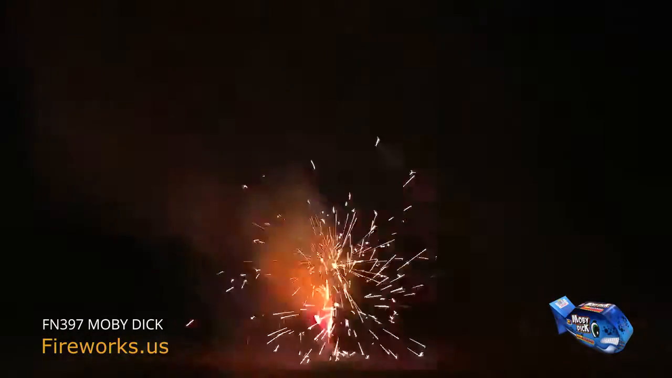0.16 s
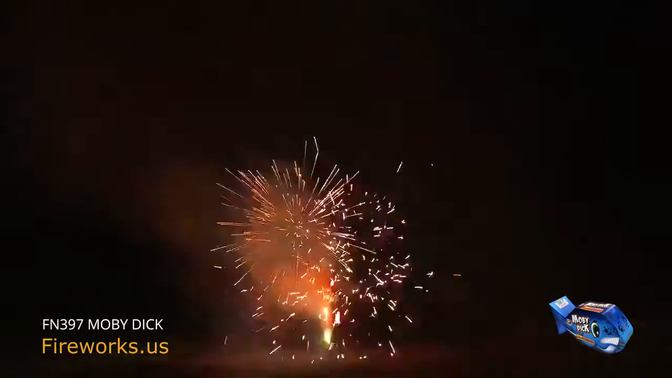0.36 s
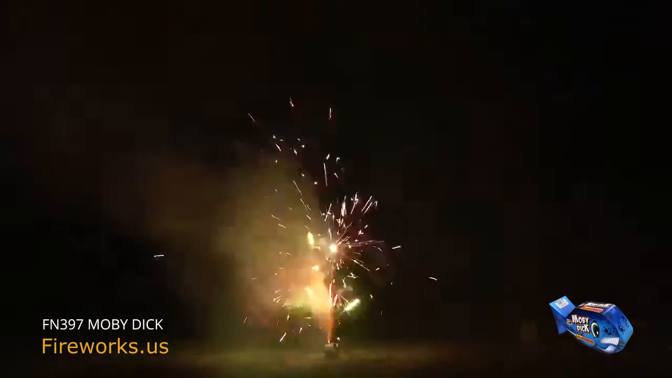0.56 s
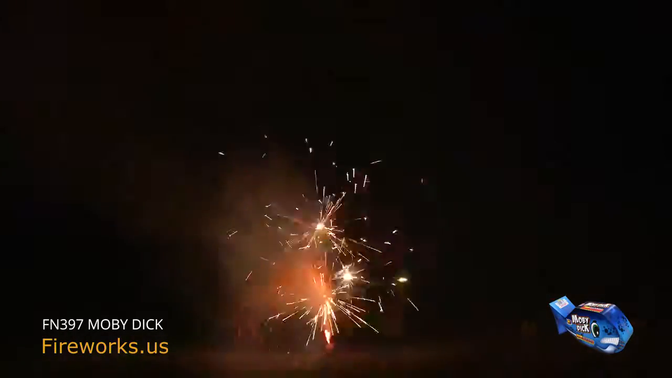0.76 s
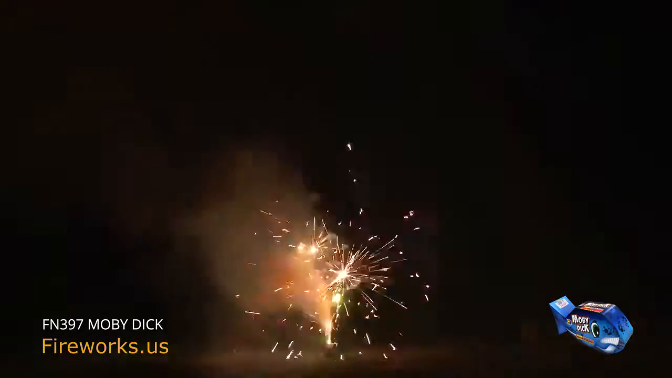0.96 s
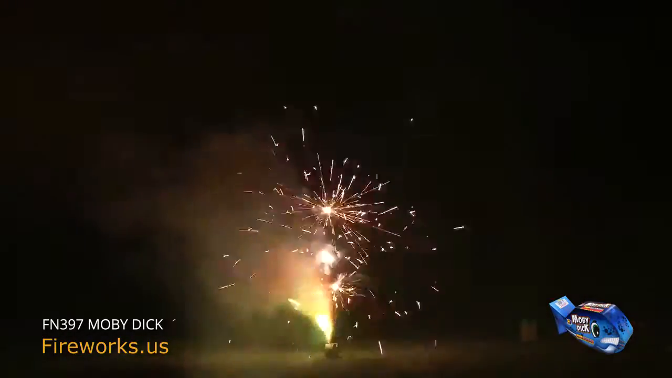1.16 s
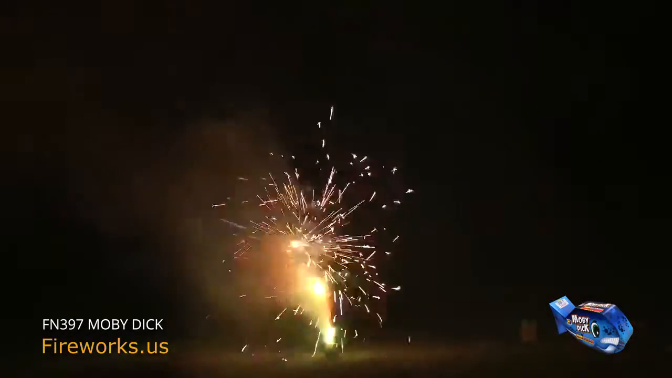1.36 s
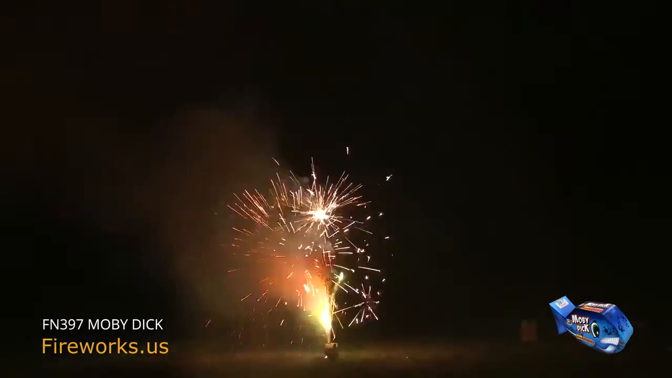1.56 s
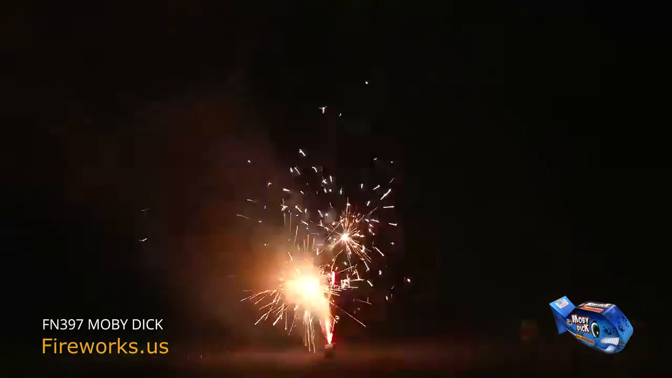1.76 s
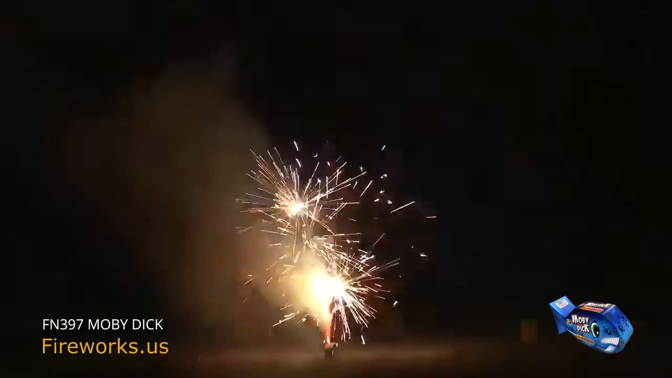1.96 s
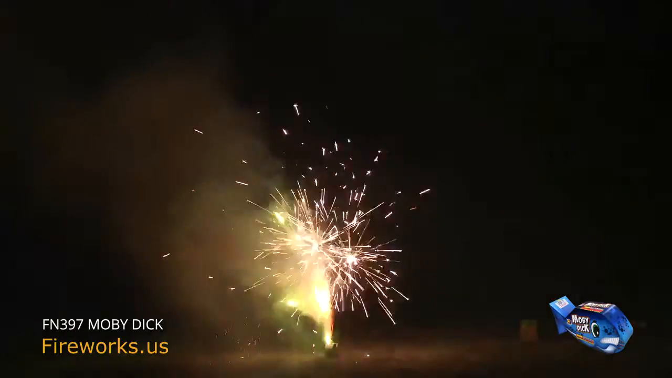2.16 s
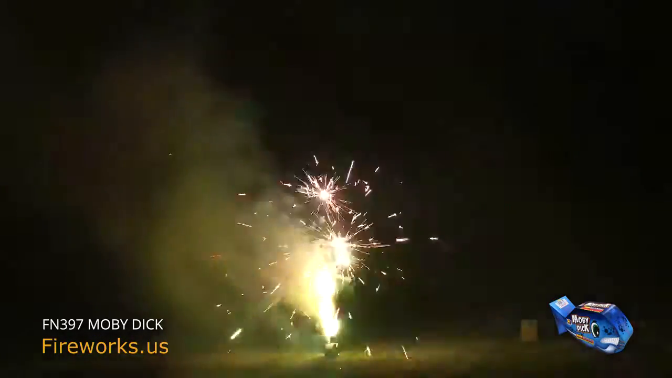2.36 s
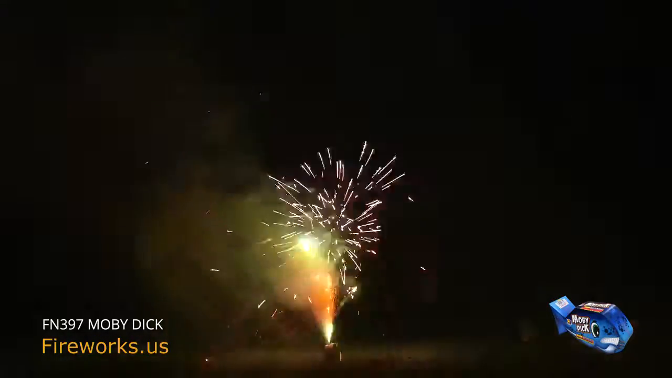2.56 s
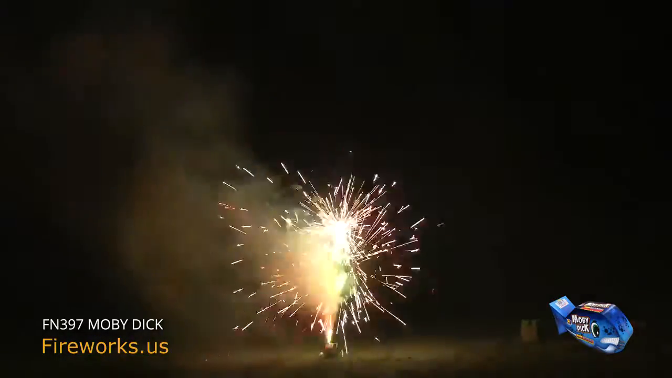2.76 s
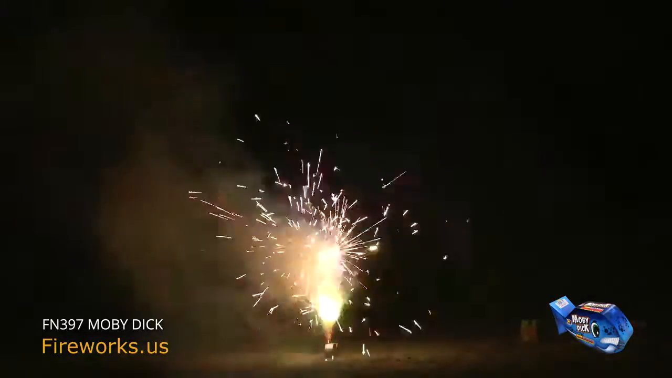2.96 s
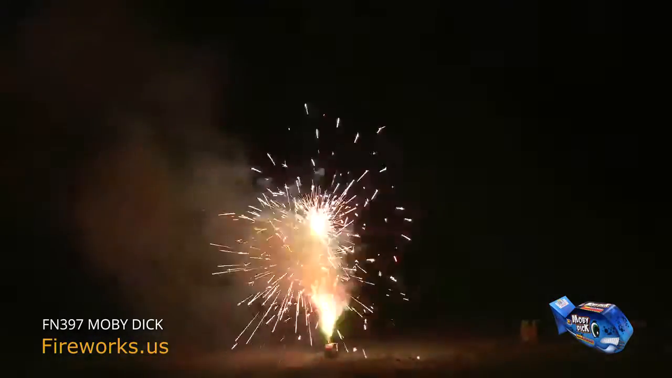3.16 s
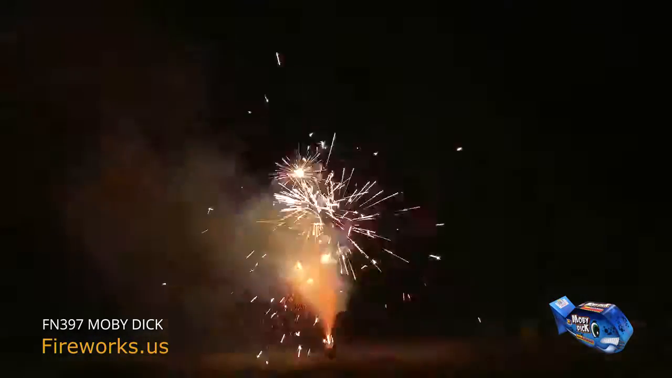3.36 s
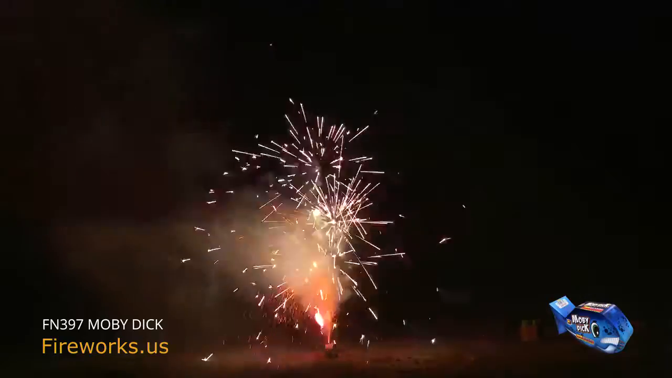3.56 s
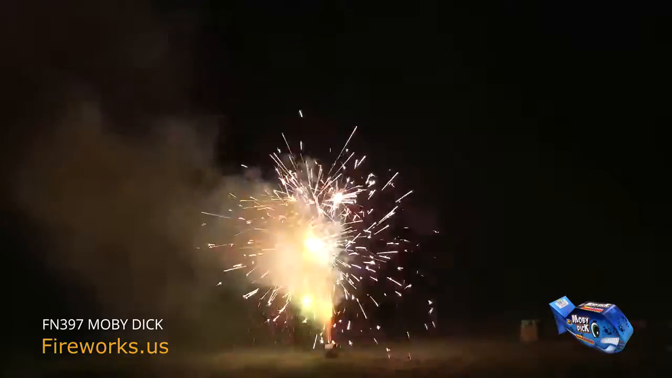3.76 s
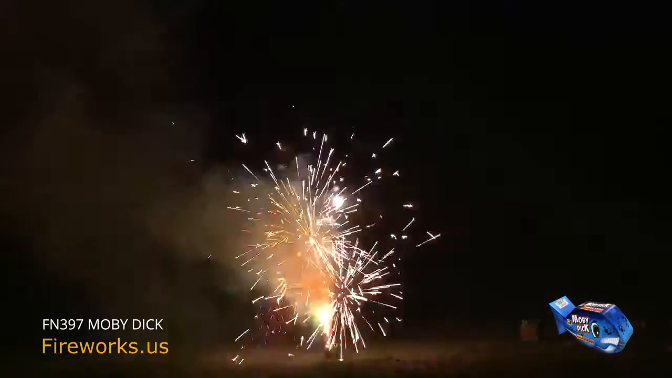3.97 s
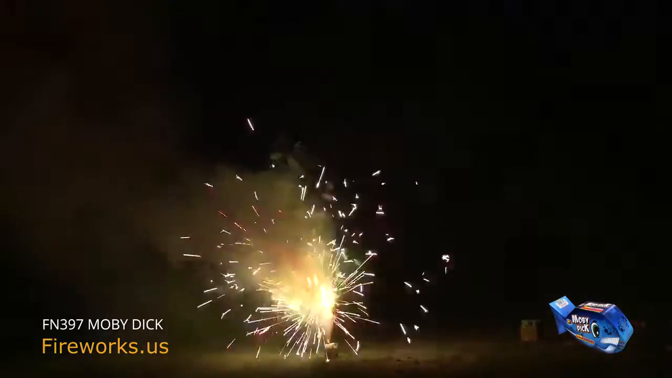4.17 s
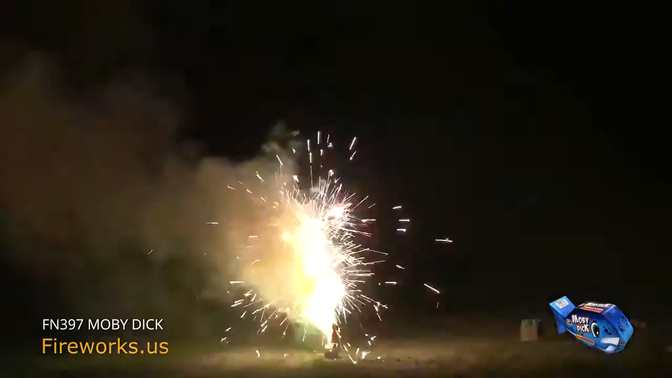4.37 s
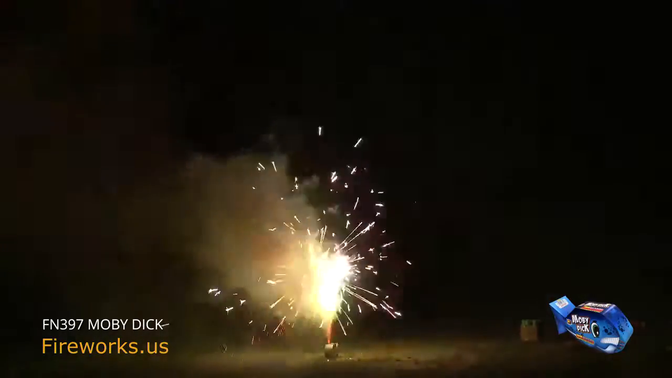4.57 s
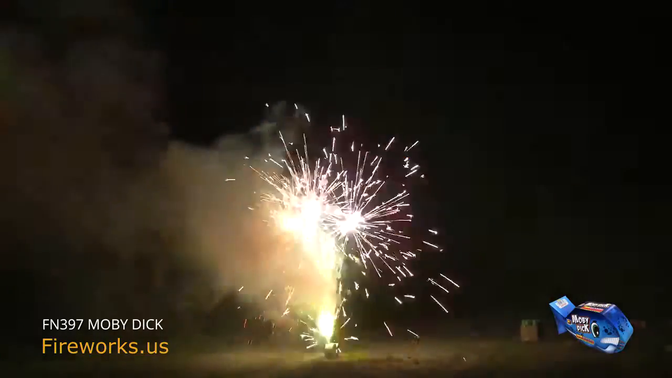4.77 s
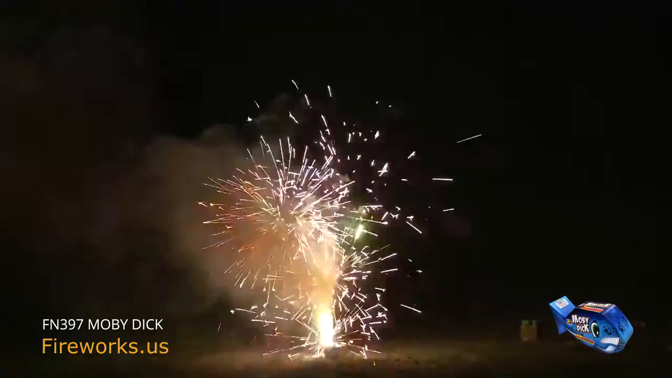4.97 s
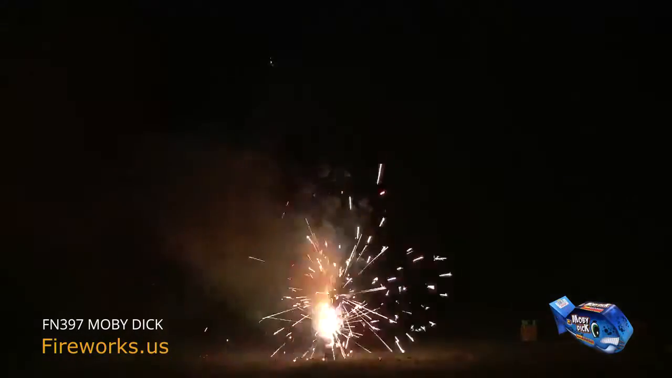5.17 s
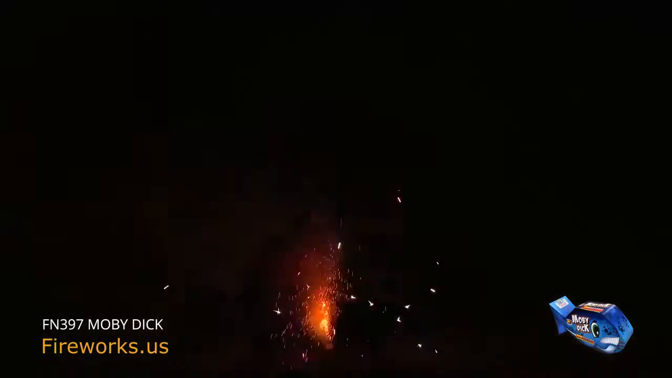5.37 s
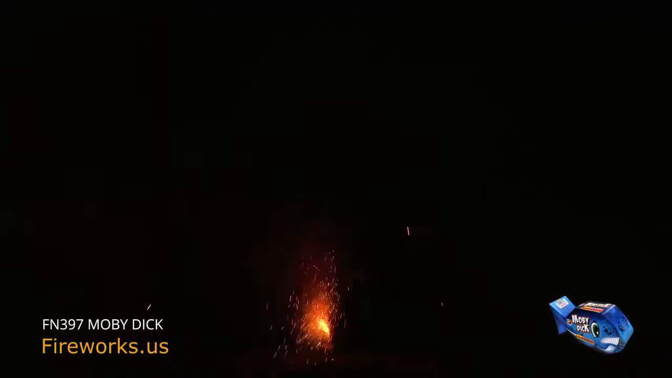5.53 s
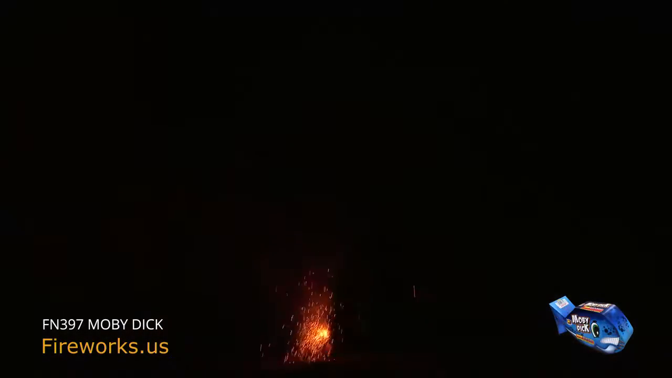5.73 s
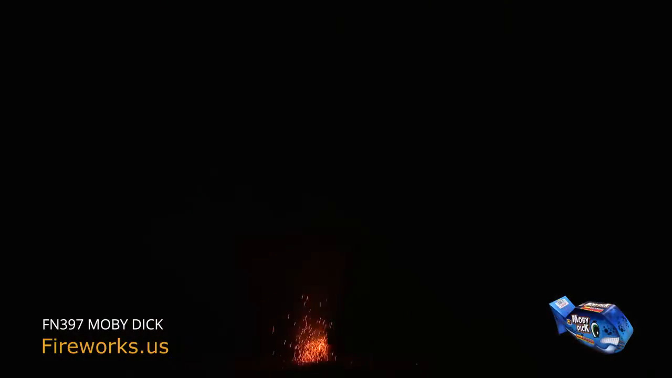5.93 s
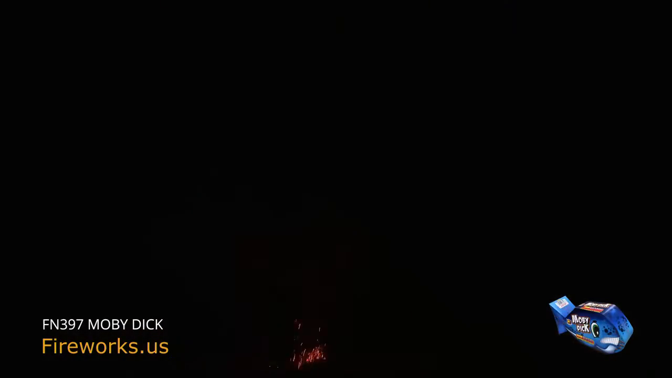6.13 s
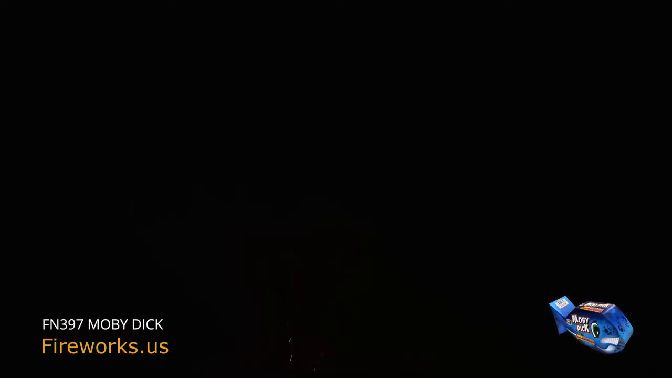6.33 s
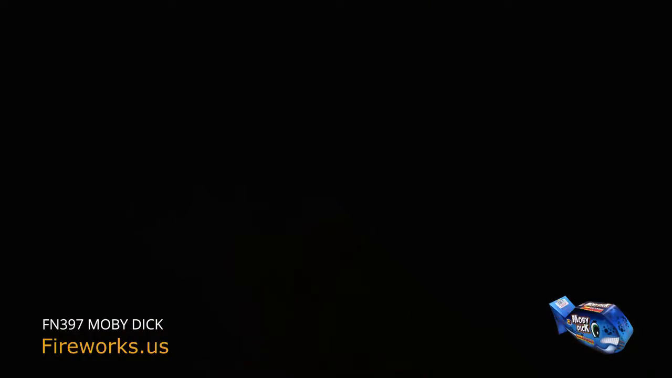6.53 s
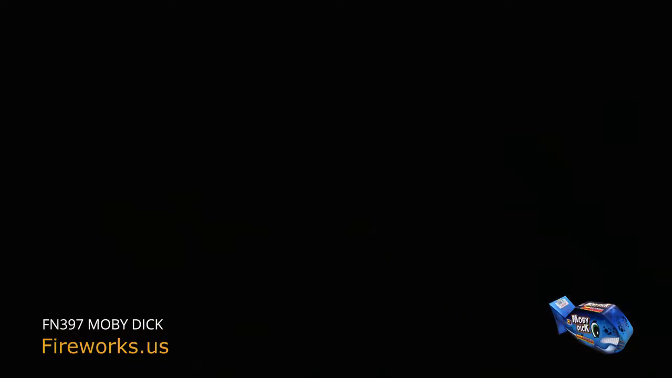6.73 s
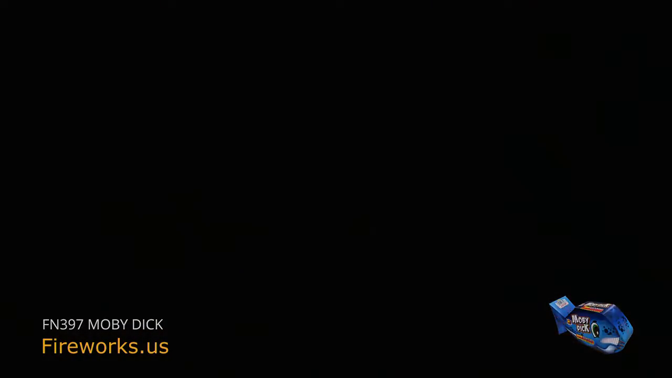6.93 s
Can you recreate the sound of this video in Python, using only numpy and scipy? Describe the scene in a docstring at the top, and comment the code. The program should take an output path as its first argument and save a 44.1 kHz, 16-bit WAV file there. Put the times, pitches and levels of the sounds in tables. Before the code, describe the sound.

A fountain firework on the ground throws out a dense, irregular stream of sharp, bright cracks over a softer hiss of gas, with a light echo from the yard. After about five and a half seconds the fuel runs out and it stops with a last couple of pops. Faint chirping insects, a few rising frog whistles and a distant engine drone remain. A small camera microphone picks it up outdoors at night.

```python
"""Sharp cracks swarm over the hiss of a fountain firework in a yard at night, until its fuel runs out.
Each bursting spark sends out a pressure pulse that arrives directly, off the ground and off two walls,
and excites the resonances of a small camera's microphone port; the hiss is the turbulent gas jet.
As the cracks end, the gain control recovers, and a distant engine, chirping insects and a few
whistling frogs come forward."""
import sys
import numpy as np
from scipy import signal
from scipy.fft import rfft, irfft, next_fast_len
from scipy.io import wavfile
from scipy.ndimage import map_coordinates

SR = 44100
rng = np.random.default_rng(int(sys.argv[2]) if len(sys.argv) > 2 else 0)


def store_pcm(level_fs):
    """Save levels as 16-bit WAV."""
    pcm = np.round(np.clip(level_fs, -1, 1) * 32767).astype(np.int16)
    wavfile.write(sys.argv[1], SR, np.atleast_2d(pcm).T)


N = 308700

# prominent spark bursts: (time [s], level over the first millisecond [dB], spectral tilt [dB/octave])
CRACKS = [(0.0059, -15, -0.5), (0.0658, -21, -1.5), (0.085, -17, 1), (0.1361, -10, -1), (0.1448, -13.5, 0),
          (0.17, -15.5, 0), (0.1753, -17.5, 0), (0.183, -19.5, 0), (0.2517, -15, 2), (0.2711, -16.5, -3),
          (0.2898, -18, 0), (0.2966, -20, -2.5), (0.3497, -10.5, -1), (0.3708, -21.5, -0.5),
          (0.4413, -22, -2), (0.4499, -23.5, -4.5), (0.467, -20.5, -3), (0.4902, -16.5, -1.5),
          (0.5148, -15.5, 1.5), (0.5204, -19, -2.5), (0.5548, -20.5, -2.5), (0.6638, -24, -2),
          (0.676, -23, 1.5), (0.6999, -18, 0.5), (0.7397, -23, 1), (0.748, -22.5, -2.5), (0.789, -14.5, 1),
          (0.8041, -25, -2), (0.8116, -12, 0.5), (0.8973, -20, 0), (0.9302, -15.5, 1), (0.9659, -19, 0.5),
          (0.9788, -19.5, -0.5), (1.002, -15, 0), (1.0245, -15.5, -0.5), (1.035, -19, -0.5),
          (1.0496, -16, 2), (1.0829, -13, 1.5), (1.0924, -14.5, 0.5), (1.0977, -22, 2.5),
          (1.104, -16.5, -0.5), (1.1575, -17.5, 1.5), (1.1749, -15.5, -1.5), (1.1963, -19, -2),
          (1.204, -18.5, 0), (1.2443, -12.5, 0.5), (1.2512, -21.5, -4), (1.2888, -17.5, -1),
          (1.2948, -20.5, 3.5), (1.3094, -13.5, 1), (1.3416, -18.5, -3), (1.3795, -14, 0), (1.398, -15, 3),
          (1.4026, -16.5, -1.5), (1.4056, -14, -1), (1.4151, -14, 0), (1.4499, -16.5, 0.5),
          (1.456, -14, 0.5), (1.4662, -24, -3), (1.4841, -18, 0), (1.5066, -14.5, -0.5), (1.519, -12.5, 4),
          (1.5281, -19.5, -0.5), (1.5348, -11.5, 1), (1.5476, -19, 0), (1.5756, -19.5, -1.5),
          (1.619, -15, 0.5), (1.6396, -27.5, -2.5), (1.6721, -26.5, 3), (1.6788, -25.5, 0.5),
          (1.6896, -18.5, 0), (1.747, -16.5, -1), (1.7851, -12.5, 0), (1.8117, -22, -3), (1.814, -12, -1),
          (1.835, -22, -1), (1.8531, -18.5, -1.5), (1.8695, -12.5, -0.5), (1.8907, -23.5, 5),
          (1.8966, -15.5, -1.5), (1.9004, -12, -0.5), (1.9189, -15, -1.5), (1.9341, -21, -0.5),
          (1.9665, -17.5, 0), (1.9783, -21, -1), (1.9901, -22, -5.5), (2.0063, -21, 2), (2.0238, -22, 0),
          (2.0795, -17.5, 0.5), (2.1024, -18, -1), (2.1494, -20.5, 1), (2.1649, -17, -1.5),
          (2.1711, -17.5, -2.5), (2.188, -13.5, 0), (2.2178, -17, -1.5), (2.2266, -12.5, -2),
          (2.2304, -15, 0.5), (2.2574, -19.5, -1), (2.299, -16, -0.5), (2.3085, -17.5, -3),
          (2.3547, -13.5, -1), (2.3719, -12, -1), (2.3917, -17, 1), (2.3944, -20, -1), (2.4224, -20, 0.5),
          (2.439, -11, 0.5), (2.4495, -14.5, -0.5), (2.4586, -14.5, -1), (2.4913, -18, 0),
          (2.502, -21.5, -2.5), (2.5215, -16, 0), (2.59, -18.5, 2.5), (2.5927, -14.5, 0),
          (2.5991, -21.5, -3.5), (2.6275, -21, -3), (2.637, -13, 2.5), (2.685, -18, 1),
          (2.7006, -22.5, 0.5), (2.7502, -14.5, 0), (2.7552, -24, -3), (2.8164, -14, -1), (2.819, -17, 1.5),
          (2.8477, -15.5, -2), (2.8504, -15, -0.5), (2.862, -14.5, 0.5), (2.9086, -13, 0),
          (2.9107, -15, -2), (2.9143, -12, 1.5), (2.9262, -24, -2.5), (2.9468, -13, -0.5),
          (2.961, -27, -4.5), (2.9672, -14, 0.5), (2.9844, -14.5, -1), (3.0236, -13.5, -1.5),
          (3.0325, -18, -1.5), (3.1015, -19.5, 1.5), (3.1087, -14, -2), (3.1322, -17.5, 0),
          (3.1408, -18.5, -1), (3.18, -18.5, 0), (3.2245, -11.5, 0), (3.2627, -16, -1.5),
          (3.2686, -12.5, 2), (3.2702, -13, -1.5), (3.3029, -19.5, 3), (3.316, -13, -1), (3.342, -21, -1.5),
          (3.3624, -12.5, -0.5), (3.389, -17.5, -2), (3.4153, -16, 0.5), (3.4231, -20.5, -3),
          (3.4273, -14.5, -0.5), (3.4584, -20.5, -2.5), (3.4677, -15.5, 2.5), (3.4716, -13.5, -0.5),
          (3.4849, -19, -2.5), (3.4904, -13.5, 0), (3.5635, -19, -0.5), (3.5942, -15, -0.5),
          (3.6159, -11.5, -0.5), (3.6311, -13, 0), (3.6382, -21, 2.5), (3.6617, -12.5, 2.5),
          (3.6635, -19, -1.5), (3.676, -29, -3.5), (3.6948, -14, 0), (3.6999, -16, 1.5),
          (3.718, -22.5, -1.5), (3.7546, -17.5, -1.5), (3.7657, -29, -3), (3.7712, -19, 0),
          (3.8067, -13.5, -2), (3.842, -23, -2), (3.8525, -13, 1.5), (3.8703, -16, 0.5),
          (3.8938, -18.5, -3), (3.9008, -25, -3.5), (3.9077, -11.5, 2), (3.9139, -19.5, 2),
          (3.9252, -22, -4), (3.9415, -16.5, 0), (3.9539, -24.5, 1.5), (3.9605, -21, -3), (3.967, -19, -5),
          (3.9838, -20.5, -3), (4.0009, -16.5, -1), (4.0415, -15.5, 2), (4.0548, -12.5, 0.5),
          (4.0608, -15.5, 0), (4.0773, -20.5, -1.5), (4.0936, -24.5, -1), (4.1038, -16, -0.5),
          (4.1474, -13.5, 1), (4.1555, -16, -1), (4.1672, -19, -1.5), (4.171, -16.5, -1),
          (4.2051, -13.5, 0), (4.2183, -12, 1), (4.2278, -18.5, -2.5), (4.2492, -14.5, 0),
          (4.2574, -23.5, -4), (4.267, -22, -1.5), (4.2789, -22.5, 1), (4.2969, -17, 2.5),
          (4.3149, -17, -1), (4.3273, -22.5, 0), (4.3688, -20, 1), (4.4265, -21.5, 2), (4.4425, -15.5, 0.5),
          (4.477, -19, -3), (4.5032, -17.5, -3), (4.5163, -13, 1), (4.532, -15, -1.5), (4.5807, -16.5, -1),
          (4.5815, -11.5, 0.5), (4.5865, -16, -1.5), (4.5879, -13, 0), (4.5994, -15, -2), (4.604, -14, 3),
          (4.6154, -15.5, -1), (4.6173, -17.5, 2.5), (4.6408, -24.5, -3.5), (4.6532, -22.5, 2),
          (4.6883, -17.5, -4), (4.7027, -20, -1), (4.7103, -11.5, 0.5), (4.7353, -15.5, 2.5),
          (4.7688, -20, -3), (4.8039, -12, 0.5), (4.8347, -15.5, -0.5), (4.8489, -12, 3),
          (4.8509, -19.5, -2), (4.8721, -13, 0.5), (4.8871, -14, 4), (4.9105, -16, -1),
          (4.919, -11.5, -1.5), (4.932, -13, 0), (4.9694, -11, 0.5), (4.9781, -15.5, -3.5),
          (4.9838, -12.5, 3.5), (4.9956, -21.5, -1), (5.0318, -20, 0), (5.053, -15.5, 0),
          (5.0632, -15.5, -1), (5.0878, -14.5, 1), (5.0908, -18.5, -3), (5.097, -20, 3), (5.1151, -12.5, 0),
          (5.136, -14, 0), (5.1455, -14, -2), (5.1608, -12.5, 5), (5.169, -21.5, -4.5),
          (5.1947, -14.5, 1.5), (5.229, -23, -1), (5.2472, -15.5, -1.5), (5.294, -31.5, 8),
          (5.3043, -14, 0), (5.3291, -14.5, -1), (5.349, -39, 11), (5.3706, -12, 2.5), (5.39, -18, -0.5),
          (5.408, -14, 2.5), (5.4217, -21.5, -5.5), (5.4937, -17, 1.5), (5.6475, -20.5, 4.5),
          (5.793, -32.5, 4)]
# spectrum of one burst's pressure pulse: (frequency [Hz], relative level [dB])
PULSE_SPECTRUM = [(40, -39.5), (150, -13.5), (245, -18), (340, -14.5), (500, -18), (680, -16.5),
                  (800, -18.5), (1150, -5), (1600, -3), (2700, -9.5), (3500, -10), (4600, -8.5), (6600, 2),
                  (8400, -5), (9400, -16.5), (11500, -16), (16000, -28)]
# spectrum of the gas jet: (frequency [Hz], relative level [dB])
JET_SPECTRUM = [(40, -24.5), (200, 0), (700, 0.5), (1300, -7.5), (2000, 4), (2800, 10.5), (3600, -0.5),
                (4600, 0.5), (6600, -6), (8500, -9.5), (11000, -28.5), (16000, -25.5)]
# resonances and notches of the camera body and microphone port: (centre [Hz], width [Hz], gain [dB])
PORT_RESONANCES = [(1347, 46, -3), (2007, 72, -3.5), (2158, 180, 4.5), (2970, 300, 1), (3270, 120, -5),
                   (3790, 140, -3), (4070, 240, 4.1), (4480, 260, -2), (5210, 460, 4), (6920, 2300, 2.5),
                   (10260, 1000, 8)]
# wall reflections: (delay [s], relative level [dB])
WALL_ECHOES = [(0.0242, -34), (.045, -25)]
# reverberation time of the yard: (frequency [Hz], time to fall 60 dB [s])
YARD_T60 = [(200, 1), (600, 0.7), (1800, 1.24), (3000, 0.62), (7000, 0.62), (10000, 0.3), (14000, 1.73)]
# colour of the reflected sound: (frequency [Hz], gain [dB])
YARD_COLOUR = [(200, 1.5), (700, -1.5), (1500, -6), (2100, -7.5), (2800, 1), (3400, -3), (4200, -2.5),
               (6600, -10.5), (9400, -1), (10300, -14.5), (12000, -9), (16000, -19)]
# harmonics of the distant engine: (time [s], fundamental level [dB], second harmonic level [dB])
ENGINE_LEVELS = [(0, -54, -55), (1.2, -54, -61.5), (2.8, -50.5, -60), (3.7, -57, -61.5), (5.4, -54, -53),
                 (6.1, -50.5, -57.5), (7, -44, -55.5)]
# even runs of insect chirps: (start [s], end [s], spacing [s], pitch [Hz], level [dB])
CHIRP_RUNS = [(5.759, 6.25, .1105, 3170, -55.5), (5.705, 5.95, 0.098, 3170, -59),
              (6.462, 7, .1025, 2980, -59.5)]
# frog calls: (time [s], length [s], start pitch [Hz], end pitch [Hz], relative level [dB])
FROG_WHISTLES = [(5.862, 0.32, 2550, 2960, -62.5), (6.104, 0.22, 2650, 3110, -62),
                 (6.66, .24, 2530, 2970, -73)]
# spectrum of the night's low rush: (frequency [Hz], relative level [dB])
NIGHT_SPECTRUM = [(15, -4), (45, -1), (85, 4.5), (140, -0.5), (190, -8), (260, -21.5), (380, -15.5),
                  (600, -15.5), (1000, -14.5), (1400, -18.5), (2000, -31.5), (3000, -27), (3600, -42.5),
                  (7000, -47.5), (16000, -57)]

BURN_GROWTH_DB_PER_S, BURNOUT_S, BURNOUT_DB_PER_S = 1.2, 5.5, 35


def spark_bursts(rows, ground_gain=0.55, ground_cutoff_hz=8500, scatter_db=-5, scatter_t60=0.014):
    """Interference: each pressure pulse adds to its duller ground reflection and scatter from the grass."""
    start_s, level_db, tilt = np.transpose(rows)[:, :, None]
    lag_ms = .17 + .31 * rng.random(start_s.shape)  # the higher the burst, the later its reflection
    size = 2048
    hz, t = np.fft.rfftfreq(size, 1 / SR), np.arange(size) / SR
    octaves = np.log2(np.clip(hz, 1200, 8000) / 5000)
    pulse = minimum_phase(log_interp(PULSE_SPECTRUM, hz) + port_db(hz) + tilt * octaves)
    bounce = ground_gain * np.exp(-2j * np.pi * hz * lag_ms / 1000) / (1 + 1j * hz / ground_cutoff_hz)
    scatter = rng.standard_normal((len(rows), size)) * amp(-60 * t / scatter_t60) * (t > .0007)
    scatter /= np.linalg.norm(scatter, axis=1, keepdims=True)
    grass = rfft(scatter) * amp(scatter_db + log_interp(YARD_COLOUR, hz))
    waves = irfft(pulse * (1 + bounce + grass))
    onset_rms = np.sqrt(np.mean(waves[:, :SR // 1000] ** 2, axis=1, keepdims=True))
    track = np.zeros(N)
    for start, wave in zip(start_s[:, 0], waves * amp(level_db) / onset_rms):
        add(track, start, wave)
    return track


def swarm(spread_s, floor_db, range_db, tilt, count):
    """A cluster process: lesser bursts gather round the cracks; most are weak, and the weak are duller."""
    parent, offset, strength, hue = rng.random((count, 4)).T
    parent_s = np.array(CRACKS)[(parent * len(CRACKS)).astype(int), 0]
    start_s = parent_s + spread_s * (2 * offset - 1)
    level_db = floor_db + range_db * strength ** 3 + burn_db(start_s)
    tilts = tilt + 4 * (hue - .5) + 1.5 * strength
    burning = (start_s > 0) & (start_s < BURNOUT_S + .09)
    return spark_bursts(np.c_[start_s, level_db, tilts][burning])


def small_sparks():
    """Fragmentation: pieces pop within milliseconds of a crack; tiny grains tick in a wider cloud."""
    fragments = swarm(spread_s=.006, floor_db=-32.5, range_db=9, tilt=-1.5, count=70)
    grains = swarm(spread_s=.09, floor_db=-50, range_db=14, tilt=-1, count=700)
    return fragments + grains


def sputter(band_hz=(1250, 4600)):
    """Band limiting muffles these pops, probably grains that burst while still in the tube."""
    pops = swarm(spread_s=.08, floor_db=-44, range_db=15, tilt=-2.5, count=430)
    return signal.sosfilt(signal.butter(2, band_hz, "bandpass", fs=SR, output="sos"), pops)


def jet(start_db=-62, flutter_db=1.0, surge_db=2.0):
    """Turbulence: gas rushing from the nozzle radiates noise that flutters fast and surges slowly."""
    hiss = shaped_noise(lambda hz: amp(log_interp(JET_SPECTRUM, hz) + port_db(hz)))
    level_db = start_db + burn_db(np.arange(N) / SR)
    return hiss * amp(level_db + flutter_db * wobble(130) + surge_db * wobble(22))


def burn_db(s):
    """Exponential growth and decay: the fountain gains strength, then its fuel runs out."""
    growth_db = BURN_GROWTH_DB_PER_S * np.minimum(s, BURNOUT_S)
    return growth_db - BURNOUT_DB_PER_S * np.maximum(s - BURNOUT_S, 0)


def yard_echo(sparks, diffuse_db=-11, build_up_s=0.012, wall_t60=0.0074, places=6):
    """Reflection: two walls slap back and trees scatter diffusely, by paths that vary with spark position."""
    echoes = np.zeros(N)
    place = np.arange(N) // (SR // 25) % places  # a different set of paths every 40 ms
    for k in range(places):
        hz, frame_s, spectra = signal.stft(rng.standard_normal(SR // 2), SR, nperseg=256)
        decay = amp(-60 * frame_s / log_interp(YARD_T60, hz)[:, None])
        response = signal.istft(spectra * decay, SR, nperseg=256)[1]
        t = np.arange(len(response)) / SR
        response *= 1 - np.exp(-t / build_up_s)
        response *= amp(diffuse_db) / np.linalg.norm(response)
        for delay_s, db in WALL_ECHOES:
            slap = rng.standard_normal(len(t)) * amp(-60 * t / wall_t60)
            add(response, delay_s + rng.normal(0, 0.0006), amp(db + 4) * slap / np.linalg.norm(slap))
        echoes += signal.fftconvolve(sparks * (place == k), response)[:N]
    return filtered(echoes, lambda hz: amp(log_interp(YARD_COLOUR, hz)))


def engine(firing_hz=77.4, sag_hz_per_s=.25):
    """Periodic excitation: a far engine drones at its slowly sagging firing rate and the octave above."""
    t = np.arange(N) / SR
    times, *levels = np.transpose(ENGINE_LEVELS)
    first_db, second_db = (np.interp(t, times, db) for db in levels)
    hz = firing_hz - sag_hz_per_s * t + .2 * wobble(4)
    phase = 2 * np.pi * np.cumsum(hz) / SR
    fundamental = amp(first_db + 0.92 * wobble(7.7)) * np.sin(phase)
    octave = amp(second_db + 1.2 * wobble(6.4)) * np.sin(2 * phase)
    return np.sqrt(2) * (fundamental + octave)


def insects(decay_s=0.002, chorus_db=-74, chorus_hz=2930, spread_hz=150, count=800):
    """Damped oscillation: each chirp is a brief tone; near insects repeat it over a random far chorus."""
    track, t = np.zeros(N), np.arange(SR // 10) / SR
    envelope = (t / decay_s / 2) ** 2 * np.exp(2 - t / decay_s)
    near = [(s, hz, db) for start, end, spacing, hz, db in CHIRP_RUNS
            for s in np.arange(start, end, spacing)]
    far = zip(rng.uniform(0, N / SR, count),
              rng.normal(chorus_hz, spread_hz, count),
              rng.normal(chorus_db, 3, count))
    for s, hz, db in near + list(far):
        add(track, s, amp(db) * envelope * np.sin(2 * np.pi * hz * t))
    return track


def frogs(gain_db=-3, waver_db=2):
    """Frequency sweeps: far frogs whistle upward, swelling softly and wavering in level."""
    track = np.zeros(N)
    for s, length_s, start_hz, end_hz, db in FROG_WHISTLES:
        glide_hz = np.linspace(start_hz, end_hz, int(length_s * SR))
        tone = np.sin(2 * np.pi * np.cumsum(glide_hz) / SR)
        add(track, s, amp(db + gain_db) * signal.windows.tukey(len(tone), .6) * tone)
    return track * amp(waver_db * wobble(60))


def night_rush(level_db=-54):
    """Ambient noise: a gently wavering rush with its energy at low frequencies."""
    rush = shaped_noise(lambda hz: amp(log_interp(NIGHT_SPECTRUM, hz)))
    return rush * amp(level_db + 0.6 * wobble(3.6))


def port_db(hz):
    """Resonance: the camera body and microphone port add bell-shaped peaks and notches."""
    return sum(db / (1 + (2 * (hz - centre) / width) ** 2) for centre, width, db in PORT_RESONANCES)


def amp(db):
    """The decibel law: 20 dB is a tenfold amplitude."""
    return 10 ** (np.asarray(db) / 20)


def log_interp(points, hz):
    """Interpolation of (frequency [Hz], value) points on a logarithmic frequency axis."""
    frequencies, values = np.transpose(points)
    return np.interp(np.log(hz + 1), np.log(frequencies + 1), values)


def wobble(rate):
    """Random modulation: a smooth curve through `rate` random knots a second."""
    return map_coordinates(rng.standard_normal(int(N * rate / SR) + 4), [np.arange(N) * rate / SR])


def filtered(x, response):
    """Linear filtering: the spectrum is multiplied by a frequency response."""
    size = next_fast_len(N + SR // 2)
    return irfft(rfft(x, size) * response(np.fft.rfftfreq(size, 1 / SR)), size)[:N]


def shaped_noise(response):
    """Spectral shaping: white noise is filtered, then scaled to unit RMS."""
    noise = filtered(rng.standard_normal(N), response)
    return noise / np.sqrt(np.mean(noise ** 2) + 1e-20)


def minimum_phase(db):
    """Causality: the response with these levels that starts at once and rings afterwards."""
    cepstrum = irfft(np.log(amp(db)))
    half = cepstrum.shape[-1] // 2
    fold = np.r_[1, np.full(half - 1, 2), 1, np.zeros(half - 1)]
    return np.exp(rfft(cepstrum * fold))


def add(track, s, sound):
    """Superposition: a sound joins the track at time s."""
    part = track[max(0, round(s * SR)):][:len(sound)]
    part += sound[:len(part)]


def scene():
    """Superposition: the fountain, its echoes and the night behind it sum at one point."""
    sparks = spark_bursts(CRACKS) + small_sparks() + sputter()
    return (sparks + yard_echo(sparks) + jet() + engine() + night_rush() + insects() + frogs())[None]


def record(dry, knee_db=-9, release_db_per_s=4.0, cutoff_hz=16700):
    """Automatic gain control: cracks hold the gain near unity; without them it creeps back up."""
    pressure = dry[0]
    recovery_db = release_db_per_s * np.arange(N) / SR
    peak_db = np.minimum(20 * np.log10(np.abs(pressure) + 1e-9), knee_db)
    held_db = np.maximum.accumulate(np.maximum(peak_db + recovery_db, knee_db)) - recovery_db
    levelled = pressure * amp(knee_db - held_db)
    return filtered(levelled, lambda hz: 1 / np.sqrt(1 + (hz / cutoff_hz) ** 120))[None]  # steep low-pass


dry = scene()
out = record(dry)
store_pcm(out)
```